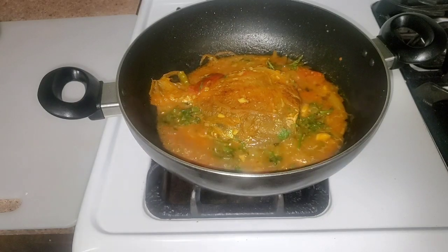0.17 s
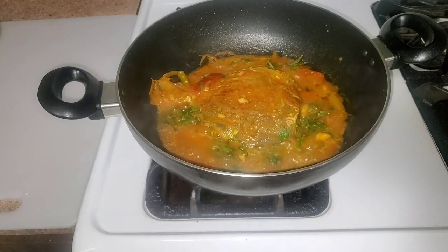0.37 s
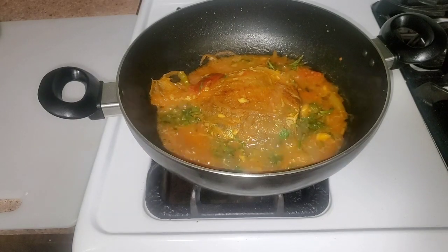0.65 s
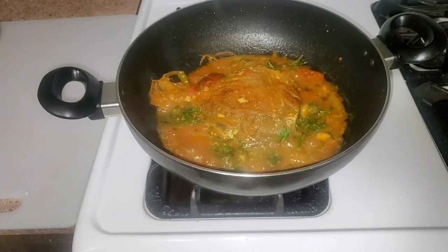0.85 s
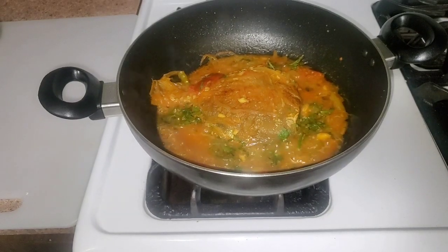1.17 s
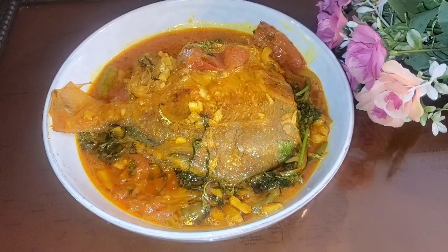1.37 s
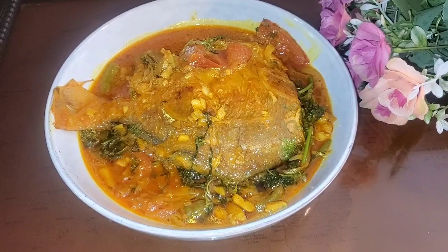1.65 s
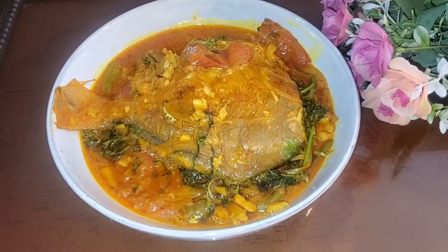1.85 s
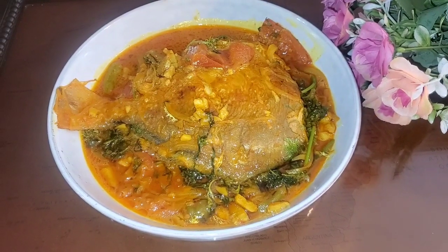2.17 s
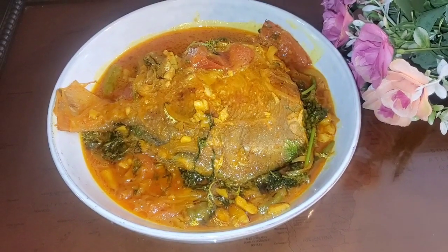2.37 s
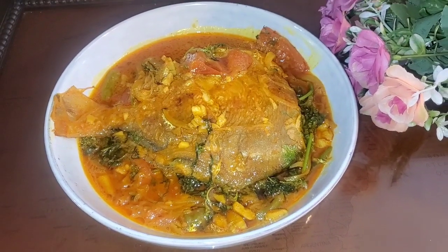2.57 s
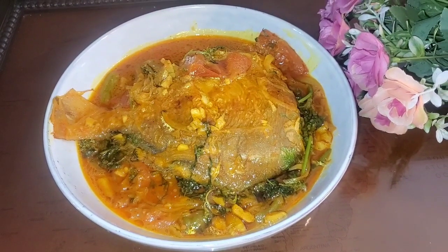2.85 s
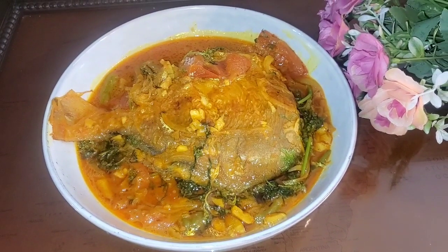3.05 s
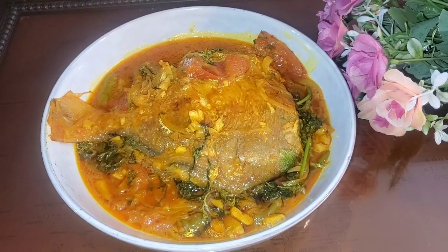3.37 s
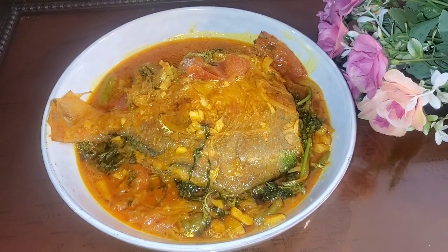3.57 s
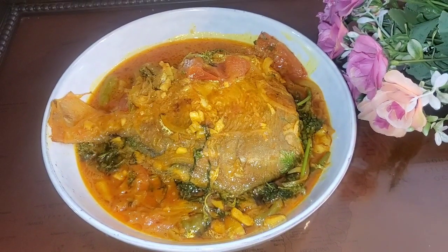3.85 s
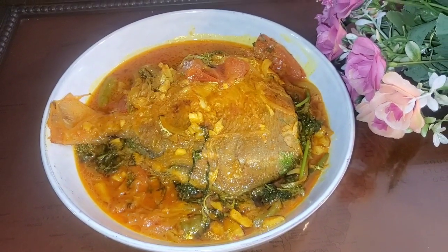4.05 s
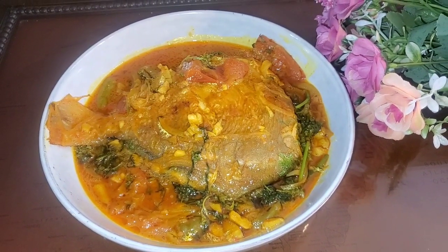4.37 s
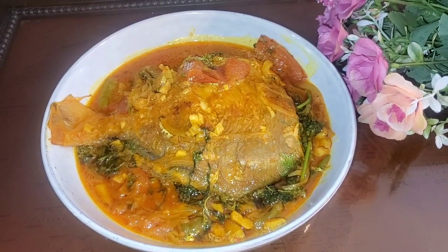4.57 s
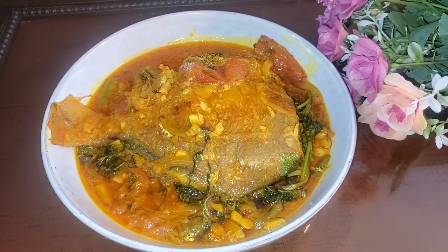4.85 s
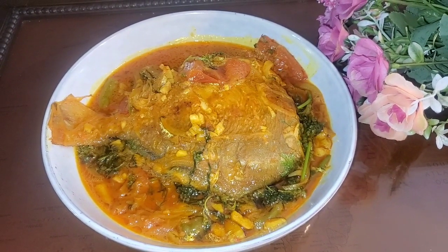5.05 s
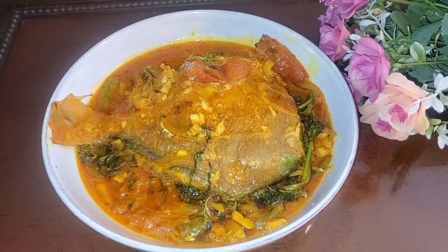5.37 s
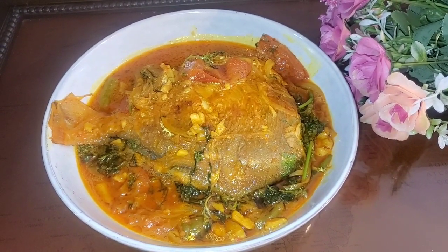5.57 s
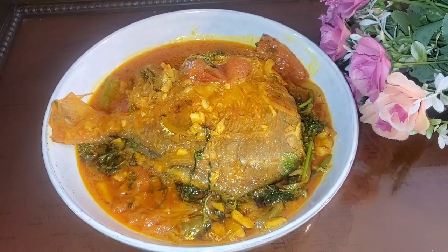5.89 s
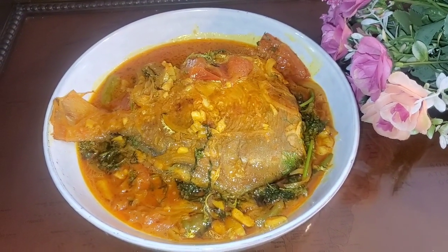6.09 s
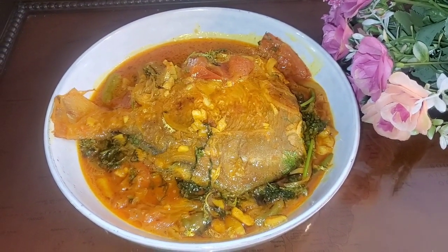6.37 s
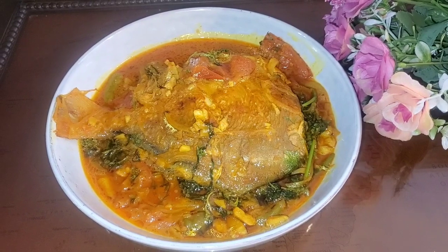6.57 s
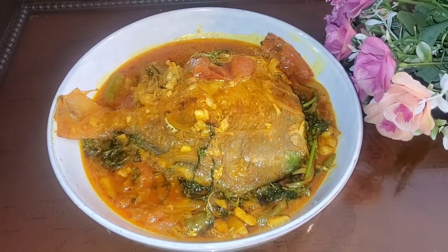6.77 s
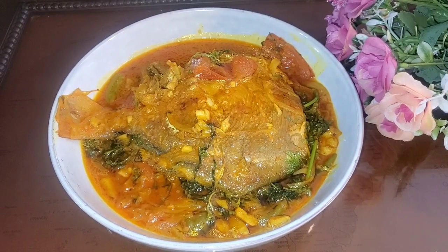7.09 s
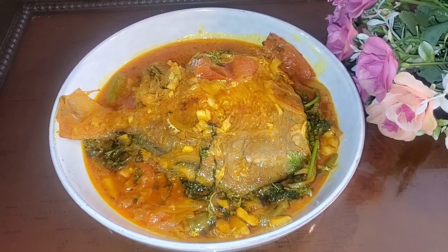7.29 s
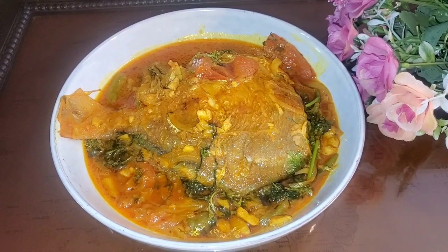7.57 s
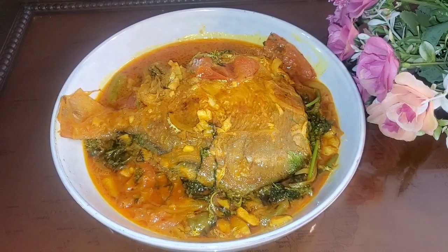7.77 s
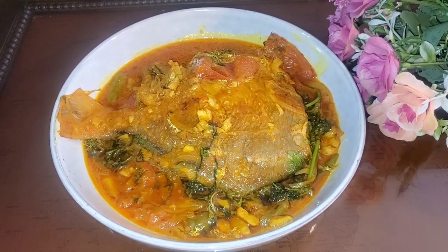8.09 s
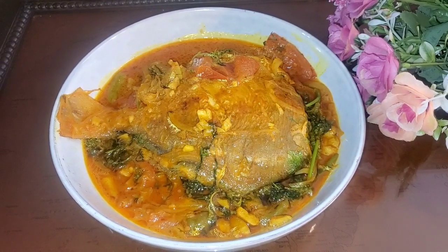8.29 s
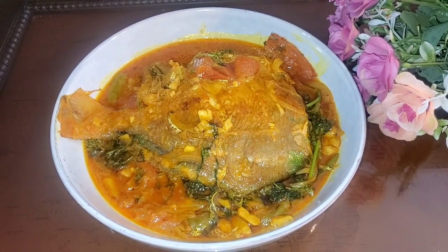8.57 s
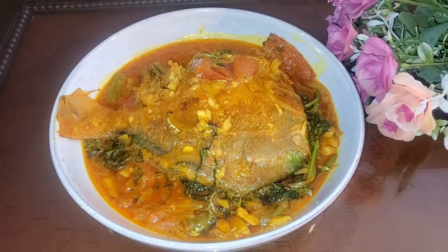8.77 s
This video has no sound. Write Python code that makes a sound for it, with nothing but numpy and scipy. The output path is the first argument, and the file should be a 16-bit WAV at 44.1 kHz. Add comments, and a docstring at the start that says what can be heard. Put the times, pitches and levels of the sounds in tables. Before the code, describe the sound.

Small birds twitter, chirp and whistle outdoors, near and far, over a soft hiss and a faint low hum.

```python
"""Small birds sing among trees: distant peeps and rasps at first, then a near bird twitters very high
and another whistles rising and falling slurs. Each note is a gliding syrinx tone that trunks and
foliage scatter into a short tail. Behind them lie a soft outdoor hiss, a low rumble, a faint mains hum
and, late on, a far motor gathering speed."""
import sys
import numpy as np
from scipy import signal
from scipy.fft import rfft, irfft, next_fast_len
from scipy.io import wavfile

SR = 44100
rng = np.random.default_rng(int(sys.argv[2]) if len(sys.argv) > 2 else 0)


def output_pcm(signal):
    """Save a mono or channel-first signal as 16-bit PCM at the path in sys.argv[1].

    Samples are clipped to [-1, 1] before scaling.
    """
    pcm = np.clip(np.atleast_2d(signal).T, -1, 1) * 32767
    wavfile.write(sys.argv[1], SR, np.round(pcm).astype(np.int16))


N = 393813

# Colour of the outdoor hiss. Each row: frequency in Hz, relative density in dB.
HISS_COLOUR = [(600, -22), (780, -18), (1050, -10.5), (1350, -12.5), (2100, -4.5), (2750, -9.5),
               (3200, -0.5), (3700, -0.5), (5100, -6.5), (5650, -2.5), (6300, -9), (7250, -5.5),
               (8050, -15.5), (8650, -8.5), (9500, -21.5), (13000, -39.5), (13800, -48), (15500, -46)]
# Fader ride of the hiss. Each row: time in seconds, level between 1 and 2.3 kHz in dB.
HISS_RIDE = [(0.0, -52), (0.1, -53), (0.73, -52), (2.2, -53.5), (3.38, -52), (4.41, -52.5), (4.78, -55),
             (7.84, -52), (8.7, -53.5), (8.8, -53)]
# Colour of the low rumble. Each row: frequency in Hz, relative density in dB.
RUMBLE_COLOUR = [(20, -31), (42, 2.5), (75, 0), (140, -0.5), (220, -7), (340, -6), (450, -11.5), (700, -18),
                 (1200, -38)]
# Fader ride of the rumble. Each row: time in seconds, level between 170 and 450 Hz in dB.
RUMBLE_RIDE = [(0.0, -65), (0.07, -64), (1.37, -66.5), (4.29, -63), (5.17, -66), (7.87, -63.5), (8.23, -64),
               (8.8, -62.5)]
# The mains hum swells and sinks. Each row: time in seconds, fundamental in dB, octave in dB.
HUM_RIDE = [(0, -63, -62), (1.1, -57.5, -63), (2.3, -78, -62.5), (4.4, -58, -63.5), (5.0, -69, -65),
            (5.85, -65, -58.5), (6.7, -76, -67.5), (8.25, -64.5, -59.5), (8.93, -62, -63.5)]
# The far motor drifts in and out. Each row: time in seconds, fundamental in dB, octave in dB.
MOTOR_RIDE = [(5.9, -72, -85), (6.1, -58, -85), (6.5, -82, -94), (6.72, -72, -56), (7.1, -65, -59.5),
              (7.3, -59, -76), (7.75, -64.5, -75), (7.92, -55, -65.5), (8.35, -56.5, -60), (8.55, -82, -82)]
# High, distant peeps. Each row: start and length in seconds, first and last pitch in Hz, dry level in dB.
FAR_PEEPS = [ (0.808, 0.11, 7350, 6770, -40.5), (0.984, 0.12, 7370, 6940, -38),
             (1.167, .11, 7600, 7050, -37.5), (0.813, 0.064, 5650, 5740, -43), (.97, .06, 5680, 5700, -45),
             (4.358, 0.093, 5080, 5670, -39.5), (4.92, 0.063, 5350, 6200, -41),
             (7.055, 0.076, 8200, 7660, -48.5), (7.441, 0.088, 6760, 6920, -33.5),
             (7.523, 0.015, 5750, 5860, -27), ]
# Lower, distant chirps. Each row: start and length in seconds, first and last pitch in Hz,
# dry level in dB.
FAR_CHIRPS = [ (0.338, 0.045, 4780, 4680, -37.5), (0.749, .1, 4720, 4540, -33.5),
              (0.928, 0.098, 4640, 4727, -28), (.95, 0.094, 3560, 3470, -34),
              (1.137, 0.077, 4600, 4600, -27), (1.402, 0.066, 4270, 4370, -37),
              (1.534, 0.026, 4340, 4420, -30), (1.622, 0.16, 4350, 4260, -47),
              (7.68, 0.31, 4410, 4310, -43), (8.355, .085, 3070, 3010, -38), ]
# Hoarse distant calls and the rough echo tails of other notes. Each row: start and length in seconds,
# first and last pitch in Hz, dry level in dB.
RASPS_AND_TAILS = [ (0.209, 0.056, 3930, 4020, -39), (0.267, 0.039, 7100, 6850, -38),
                   (0.276, 0.065, 5350, 5750, -40), (.48, .19, 4250, 4230, -38.5),
                   (0.558, .1, 3520, 3380, -38), (1.242, 0.11, 4250, 3930, -40),
                   (1.607, 0.23, 8340, 8680, -46.5), (1.887, 0.14, 8500, 8560, -45.5),
                   (2.115, 0.072, 8490, 8350, -39), (2.254, 0.14, 8230, 7370, -37),
                   (2.51, .09, 4100, 3380, -31), (2.6, .12, 3500, 3800, -32.5),
                   (2.72, 0.15, 3590, 3460, -38.5), (2.685, 0.25, 5110, 4650, -41),
                   (2.739, 0.32, 4055, 4400, -42), (3.105, 0.26, 7420, 7120, -37),
                   (3.426, .14, 7310, 7340, -30), (3.459, 0.084, 7930, 8520, -37),
                   (3.643, 0.062, 7570, 7440, -24), (3.692, 0.025, 8770, 8300, -35),
                   (4.999, .13, 7580, 7500, -37), (7.303, 0.06, 8480, 8560, -36.5),
                   (7.415, 0.18, 3994, 3575, -35), (7.929, 0.14, 3580, 3360, -40),
                   (8.134, 0.046, 8500, 8480, -43), (8.171, 0.046, 6950, 6670, -35.5),
                   (8.28, .06, 3490, 3460, -41), (8.728, .11, 3040, 3350, -35.5),
                   (8.841, 0.063, 3440, 3150, -32.5), ]
# Three tiny pitched ticks. Each row: start in seconds, dry level in dB.
TICKS = [(.267, -42), (.313, -35), (.374, -40)]
# Thin, clean calls. Each row: start and length in seconds, first and last pitch in Hz, dry level in dB,
# bend of the glide, loudest point from 0 to 1.
THIN_CALLS = [ (0.0, .32, 8080, 7590, -45, 0.78, 1), (6.13, 0.17, 8850, 8130, -43, 0.46, 0.3),
              (6.278, 0.31, 8200, 7570, -50, 1.5, 1), (6.629, 0.03, 3650, 3720, -41.5, 0.93, .5),
              (7.728, .024, 5350, 3550, -28.5, .45, .5), (7.754, 0.039, 3100, 2370, -31.5, 1.4, 0),
              (8.117, 0.0295, 7380, 7140, -34.5, 2.2, 0.4), ]
# Whistled slurs. Each row: start and length in seconds, first and last pitch in Hz, dry level in dB,
# bend of the glide, loudest point from 0 to 1, foliage send in dB.
WHISTLES = [ (3.684, 0.054, 2600, 3555, -29, 0.78, 1, -3), (3.805, 0.16, 3060, 2986, -35.5, 0.66, 0.4, -7),
            (3.852, 0.015, 3680, 3630, -22, 1, 0.3, -12), (3.872, .034, 3700, 3440, -18.5, 2, .68, -13),
            (3.931, .08, 3033, 4505, -22.5, 2.4, 0.68, -2.5), (4.003, 0.028, 4320, 4430, -31, .5, .4, -3),
            (3.858, 0.048, 4020, 3670, -27.5, 2.2, .45, -13),
            (5.268, .034, 2080, 2950, -40.5, 0.9, 0.2, -14), (5.304, .032, 2980, 3500, -21, 1, .2, -13),
            (5.407, .075, 3200, 3395, -24, 2.3, 0.7, -14), (5.474, 0.075, 3360, 4570, -17, 1.1, 0.17, -15),
            (5.622, 0.078, 3540, 3730, -32, 0.85, 0, -8), (5.626, 0.12, 3100, 3314, -35, .6, 0.1, -9),
            (5.798, .14, 3340, 3710, -39.5, 0.46, 0, -5.5), (5.806, 0.12, 3820, 4040, -42, 0.54, 0.3, -9),
            (6.786, 0.034, 2940, 3203, -35, 1.24, 0.8, -10),
            (6.928, 0.08, 3146, 2940, -29.5, 1.97, 0.35, -7),
            (7.007, 0.088, 2967, 3113, -29, 0.597, 0.35, -8),
            (7.061, 0.096, 2965, 2685, -37.5, 0.86, 0, -7.5),
            (7.875, 0.083, 3370, 3010, -28.5, 2.35, 0.1, -3.5),
            (7.89, 0.061, 4000, 3440, -27, 1.7, 0.54, -12), (7.967, 0.22, 3016, 2895, -41, 0.79, 0, -10), ]
# The near bird's syllables. Each row: start and length in seconds, crest in Hz, rise in Hz, rise time in
# seconds, sag and fall in Hz, dry level in dB, loudest point from 0 to 1, waver as a share of the pitch.
TWITTER = [ (3.059, 0.13, 7600, 102, .02, 378, 700, -39, 1, 0.0069),
           (3.197, 0.056, 7300, 97, .02, 50, 1550, -31, 0.46, 0.0061),
           (3.342, 0.077, 7590, 1398, .036, 80, 0, -28, 0.25, 0.0079),
           (3.434, 0.042, 7390, -10, .02, 48, 800, -26.5, 0.9, 0.013),
           (3.472, 0.063, 7400, 296, .01, 50, 3, -27.5, 0.1, 0.013),
           (4.339, 0.038, 8630, 850, .018, 100, 0, -29.5, 0.7, 0.0066),
           (4.369, .093, 8290, 0, .02, 80, 1100, -24, .1, .006),
           (4.47, 0.076, 7330, -7, .02, 0, 2, -24.5, 0.1, 0.008),
           (4.51, .145, 7440, 0, .02, 430, 900, -17, .2, .005),
           (4.853, .031, 7900, 1600, .035, 0, 0, -28, .65, .006),
           (4.901, .117, 7760, 0, .02, 0, 1100, -22.5, .06, .009),
           (7.168, 0.12, 7430, 350, .01, 520, -2, -35, 0.5, 0.0042),
           (7.287, .085, 7800, 3902, .014, 500, 900, -27.5, 0.9, 0.0194),
           (7.367, 0.036, 7100, 303, .01, 148, 0, -23, 0.5, .022),
           (7.455, .076, 7930, 450, .012, 550, 2000, -23.5, .9, .02),
           (7.576, .094, 7660, 2000, .02, 1000, 1950, -21.5, .72, .023), ]


def undb(db):
    """Decibels to gain."""
    return 10 ** (np.asarray(db) / 20)


def ride(rows):
    """One fader curve per level column, in straight lines from point to point."""
    times, *columns = np.transpose(rows)
    return [np.interp(np.arange(N) / SR, times, column) for column in columns]


def drift(rate_hz, size):
    """Random modulation with a spread near 1, reaching a new value rate_hz times a second."""
    place = np.arange(size) * rate_hz / SR
    knots = rng.standard_normal(4096)
    return np.interp(place, np.arange(4096), 1.243 * knots, period=4096)


def noise(colour):
    """Noise of rms 1 with the given (Hz, dB) colour."""
    hz, db = np.transpose(colour)
    size = next_fast_len(N)
    bin_hz = np.maximum(np.arange(size // 2 + 1) * SR / size, 1)
    eq = undb(np.interp(np.log(bin_hz), np.log(hz), db))
    coloured = irfft(rfft(rng.standard_normal(size)) * eq, size)[:N]
    return coloured / coloured.std()


def tones(notes, waver, waver_hz, flutter_db, octave_db=-58, edge_s=.004):
    """Gliding tones from (s, Hz, dB) points; pitch and level tremble, with a trace of octave on top."""
    out = np.zeros(N + SR)
    for note in notes:
        times, hz, db = np.transpose(note)
        first = max(int((times[0] - edge_s / 2) * SR), 0)
        end = max(int((times[-1] + edge_s / 2) * SR), first + 2)
        t = np.arange(first, end) / SR
        pitch = np.interp(t, times, hz) * (1 + waver * drift(waver_hz, len(t)))
        phase = 2 * np.pi * np.cumsum(pitch) / SR
        ramp = np.clip(np.minimum(t - t[0], t[-1] - t) / edge_s, 0, 1)
        gate = np.sin(np.pi / 2 * ramp) ** 2
        gain = gate * undb(np.interp(t, times, db) + flutter_db * drift(waver_hz / 2, len(t)))
        out[first:end] += np.sqrt(2) * gain * (np.sin(phase) + undb(octave_db) * np.sin(2 * phase))
    return out[:N]


def swell(share, loudest, swell_db, fade_db):
    """A note's envelope in dB: it swells to its loudest point, then fades."""
    loudest = np.clip(loudest, .05, .95)
    attack = swell_db * (1 - share / loudest) ** 2
    release = fade_db * ((share - loudest) / (1 - loudest)) ** 2
    return -np.where(share < loudest, attack, release)


def slur(start, length, from_hz, to_hz, db, bend=1, loudest=.25, *, swell_db, fade_db):
    """One glide as (s, Hz, dB) points: bend 1 sweeps evenly, above 1 late, below 1 early."""
    share = np.linspace(0, 1, 60)
    hz = from_hz + (to_hz - from_hz) * share ** bend
    return np.column_stack([start + share * length, hz, db + swell(share, loudest, swell_db, fade_db)])


def trees(dry, direct_db, trunks_db, foliage_db, t60_s, spread_s=.05, count=14):
    """The direct sound, early reflections off trunks and a diffuse tail out of the foliage."""
    t = np.arange(SR) / SR
    build_up = 1 - np.exp(-t / .015)
    foliage = rng.standard_normal(SR) * undb(-60 * t / t60_s) * build_up
    lateness, strength = rng.random((count, 2)).T
    delays = ((.003 + spread_s * lateness) * SR).astype(int)
    trunks = np.zeros(SR)
    trunks[delays] = (.5 + strength) * np.exp(-lateness) * (-1) ** np.arange(count)
    early = undb(trunks_db) * trunks / np.linalg.norm(trunks)
    tail = undb(foliage_db) * foliage / np.linalg.norm(foliage)
    return undb(direct_db) * dry + signal.fftconvolve(dry, early + tail)[:N]


def outdoor_bed(hiss_over_band_db=11.5, rumble_over_band_db=4.5):
    """Gently wavering hiss over a low rumble; each is louder in full than the band its fader follows."""
    (hiss_db,), (rumble_db,) = ride(HISS_RIDE), ride(RUMBLE_RIDE)
    hiss = noise(HISS_COLOUR) * undb(hiss_db + hiss_over_band_db + .23 * drift(11, N))
    rumble = noise(RUMBLE_COLOUR) * undb(rumble_db + rumble_over_band_db + .7 * drift(3.1, N))
    return hiss + rumble


def mains_hum(mains_hz=59.1, wander_db=3.4):
    """A faint, wavering mains tone and its octave, each wandering in level."""
    pitch = mains_hz * (1 + .0059 * drift(6.9, N))
    phase = 2 * np.pi * np.cumsum(pitch) / SR
    return np.sqrt(2) * sum(undb(db + wander_db * drift(4.4, N)) * np.sin(harmonic * phase)
                            for harmonic, db in enumerate(ride(HUM_RIDE), 1))


def far_motor(start_hz=71, climb_hz_per_s=11):
    """A low drone and its octave, rising as the motor speeds up evenly."""
    times, fundamental_db, octave_db = np.transpose(MOTOR_RIDE)
    hz = start_hz + climb_hz_per_s * (times - times[0])
    partials = [np.column_stack([times, hz, fundamental_db]), np.column_stack([times, 2 * hz, octave_db])]
    return tones(partials, waver=.0087, waver_hz=24, flutter_db=2.5, edge_s=.0475)


def far_flock(low_hz=3200, high_hz=4600, max_glide=.099, count=60):
    """Many birds, very far off: short random slurs that melt into the hiss."""
    notes = []
    for when, pitch, slope, length, strength in rng.random((count, 5)):
        start, length_s = when * N / SR, .063 * (.5 + length)
        hz = low_hz + (high_hz - low_hz) * pitch
        glide = max_glide * (2 * slope - 1)
        db = -53 + 6 * strength
        notes.append([(start, hz * (1 - glide), db), (start + length_s, hz * (1 + glide), db)])
    chorus = tones(notes, waver=.014, waver_hz=298, flutter_db=0)
    return trees(chorus, direct_db=-15, trunks_db=-21, foliage_db=-7, t60_s=.61)


def far_birds():
    """Peeps and chirps washed in tree scatter, with rasps and echo tails roughened by a pitch shake."""
    peeps = tones([slur(*row, swell_db=2.5, fade_db=3) for row in FAR_PEEPS],
                  waver=.0153, waver_hz=358, flutter_db=4)
    chirps = tones([slur(*row, swell_db=8, fade_db=8) for row in FAR_CHIRPS],
                   waver=.02, waver_hz=305, flutter_db=4)
    rough = tones([slur(*row, swell_db=5, fade_db=2) for row in RASPS_AND_TAILS],
                  waver=.042, waver_hz=452, flutter_db=2.5)
    return (trees(peeps, direct_db=-2, trunks_db=-7, foliage_db=-4.5, t60_s=.52)
            + trees(chirps, direct_db=-5.5, trunks_db=-16, foliage_db=-5.5, t60_s=.89)
            + trees(rough, direct_db=-7, trunks_db=-7.5, foliage_db=-7, t60_s=.58))


def ticking_bird(hz=3190, length_s=.016):
    """Three notes on one pitch, so short that they sound as ticks."""
    notes = [slur(start, length_s, hz, hz, db, swell_db=9, fade_db=6) for start, db in TICKS]
    ticks = tones(notes, waver=.015, waver_hz=244, flutter_db=5.5)
    return trees(ticks, direct_db=-2.5, trunks_db=-22, foliage_db=-6, t60_s=.54)


def thin_calls():
    """Fine threads of birdsong, most of them sliding down."""
    notes = [slur(*row, swell_db=6, fade_db=4) for row in THIN_CALLS]
    calls = tones(notes, waver=.006, waver_hz=246, flutter_db=4)
    return trees(calls, direct_db=-2.5, trunks_db=-5, foliage_db=-11, t60_s=.77)


def whistling_bird():
    """Rising and falling syrinx slurs, each with its own send into the foliage."""
    out = np.zeros(N)
    for *row, send_db in WHISTLES:
        note = slur(*row, swell_db=14.5, fade_db=9.5)
        whistle = tones([note], waver=.0053, waver_hz=236, flutter_db=1.2, octave_db=-43)
        out += trees(whistle, direct_db=-2, trunks_db=-9, foliage_db=send_db, t60_s=.87)
    return out


def syllable(start, length, crest_hz, rise_hz, rise_s, sag_hz, fall_hz, db, loudest, fall_hz_per_s=86000):
    """One twitter as (s, Hz, dB) points: the pitch flicks up to its crest, sags and drops away."""
    share = np.linspace(0, 1, 80)
    t = share * length
    upstroke = rise_hz * np.maximum(1 - t / rise_s, 0)
    downstroke = np.maximum(fall_hz - fall_hz_per_s * (length - t), 0)
    hz = crest_hz - upstroke - sag_hz * share ** 2 - downstroke
    return np.column_stack([start + t, hz, db + swell(share, loudest, swell_db=8.5, fade_db=12)])


def twittering_bird():
    """The lead voice, close up: very high arched syllables, some clean and some shaky."""
    song = sum(tones([syllable(*row)], waver=waver, waver_hz=255.4, flutter_db=1.5, octave_db=-49.5)
               for *row, waver in TWITTER)
    return trees(song, direct_db=-1.5, trunks_db=-5, foliage_db=-10, t60_s=.49)


def scene():
    """Layers stacked from back to front, all panned dead centre."""
    backdrop = outdoor_bed() + mains_hum() + far_motor() + far_flock() + far_birds()
    foreground = ticking_bird() + thin_calls() + whistling_bird() + twittering_bird()
    mono = backdrop + foreground
    return np.array([mono, mono])


def record(dry, top_hz=15500):
    """A steep low-pass trims the very top of the mix."""
    return signal.sosfilt(signal.ellip(10, .1, 80, top_hz, fs=SR, output="sos"), dry)


dry = scene()
out = record(dry)
output_pcm(out)
```